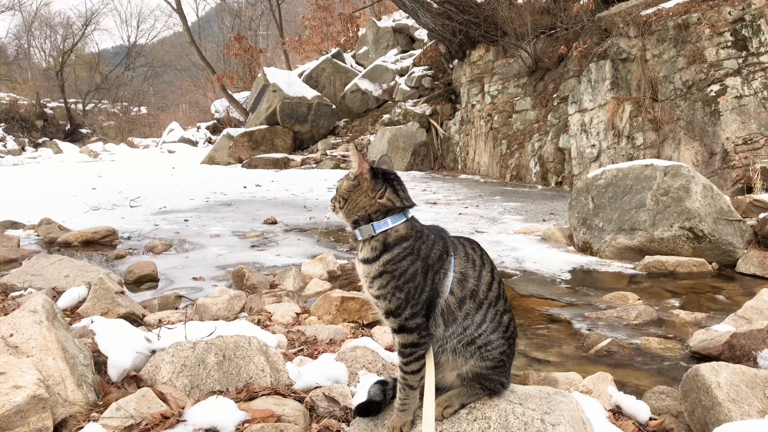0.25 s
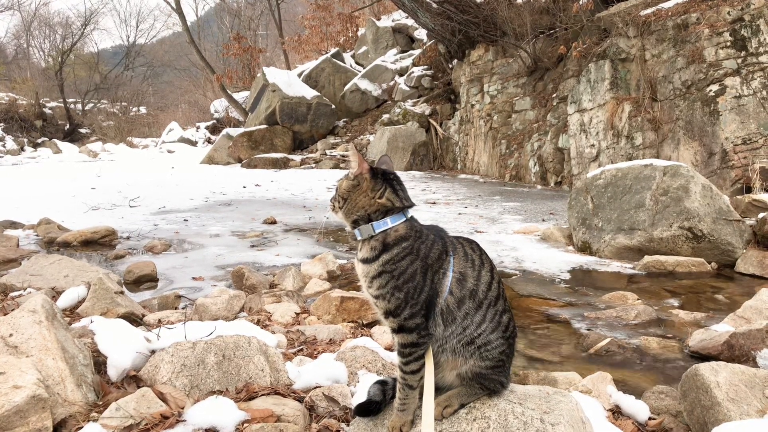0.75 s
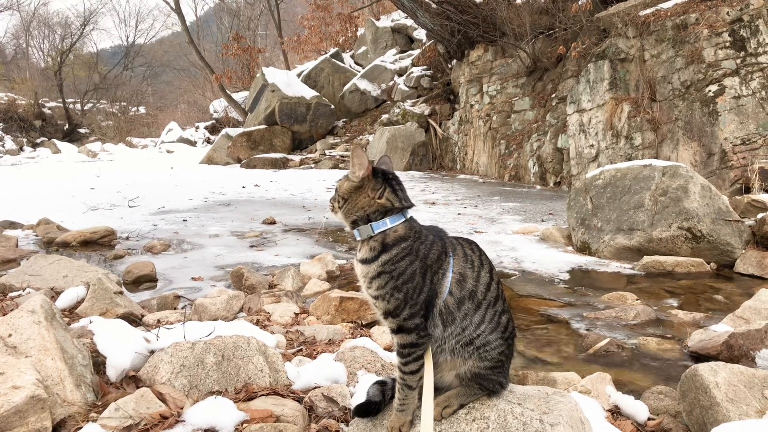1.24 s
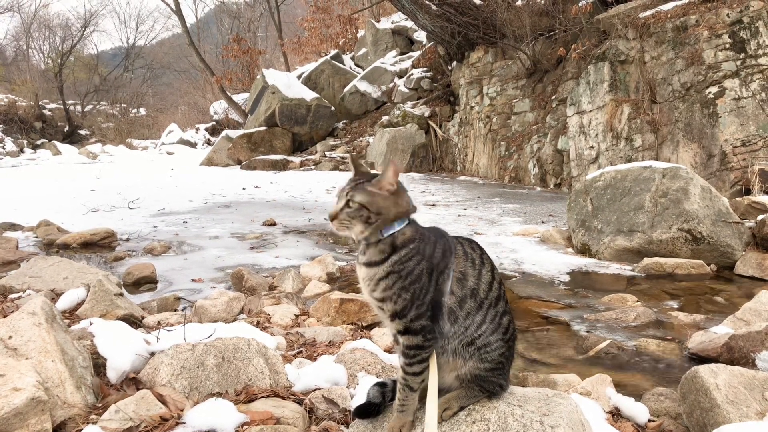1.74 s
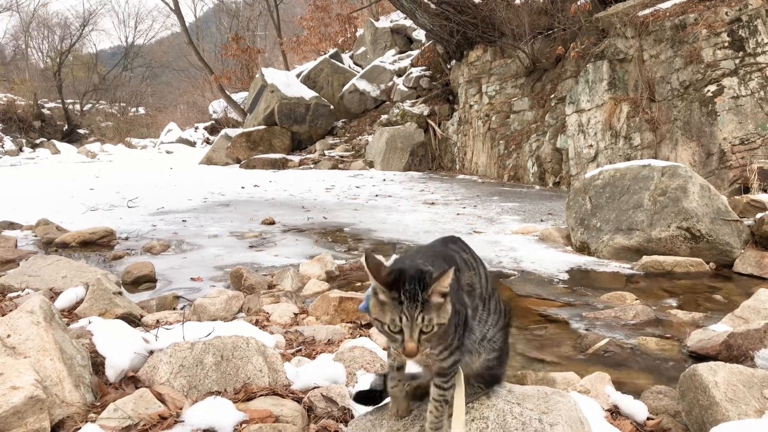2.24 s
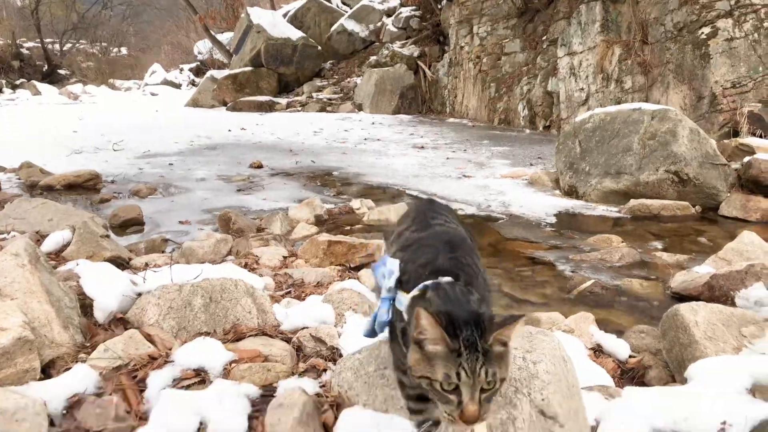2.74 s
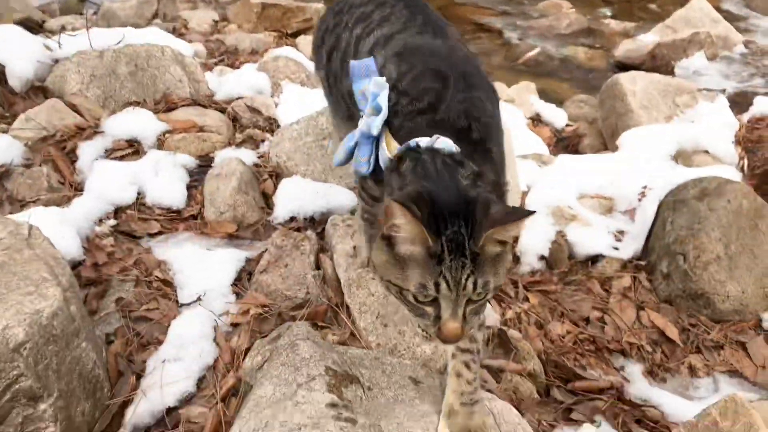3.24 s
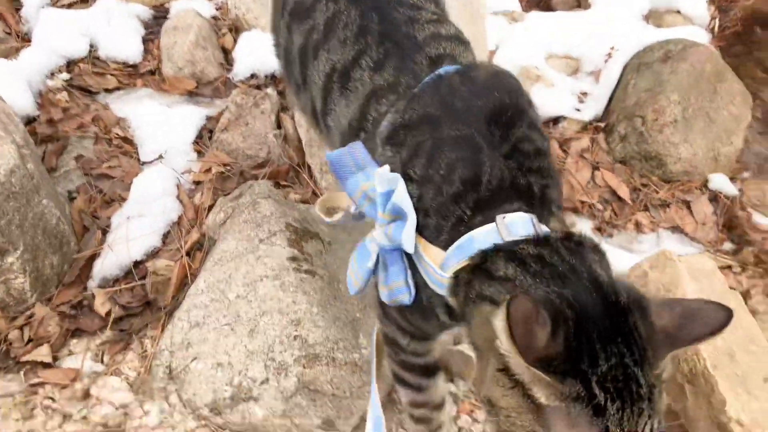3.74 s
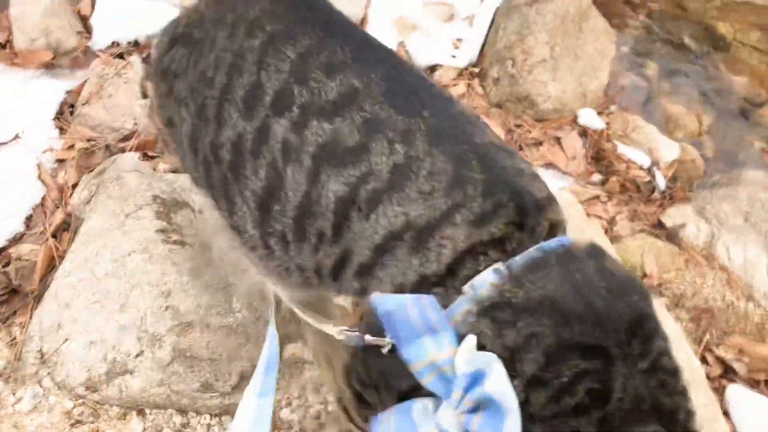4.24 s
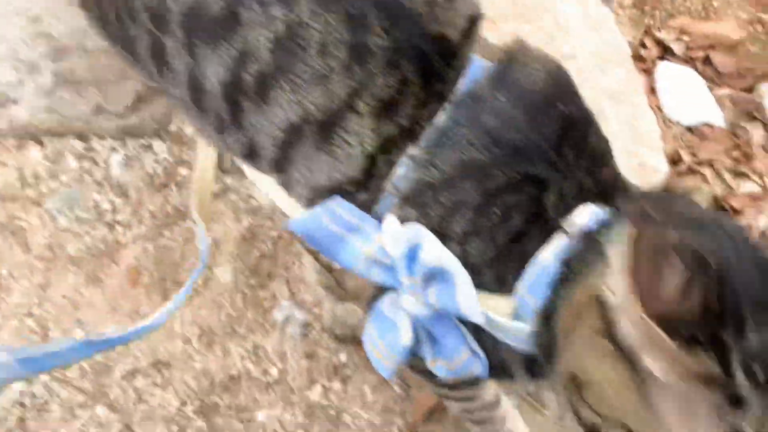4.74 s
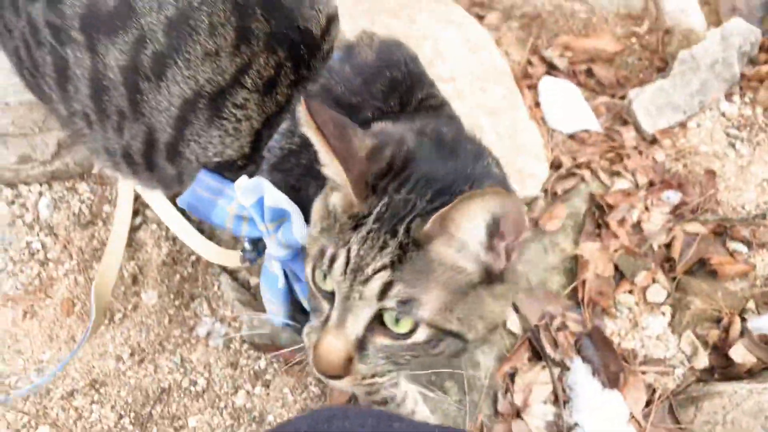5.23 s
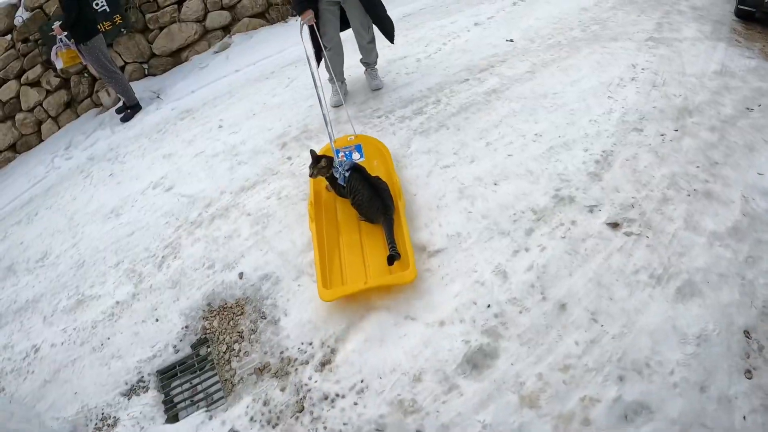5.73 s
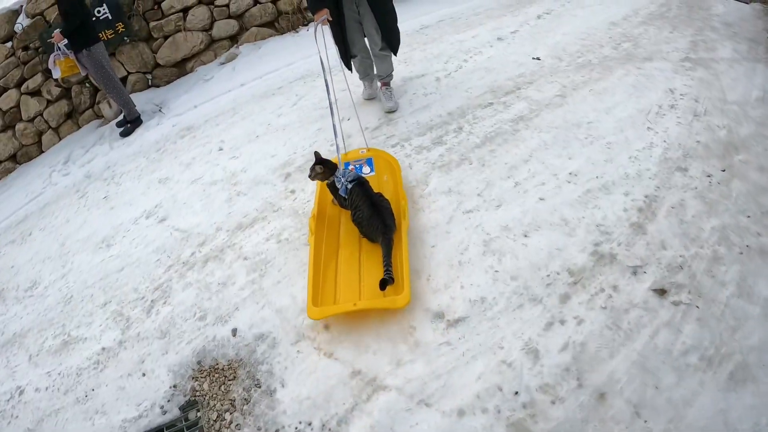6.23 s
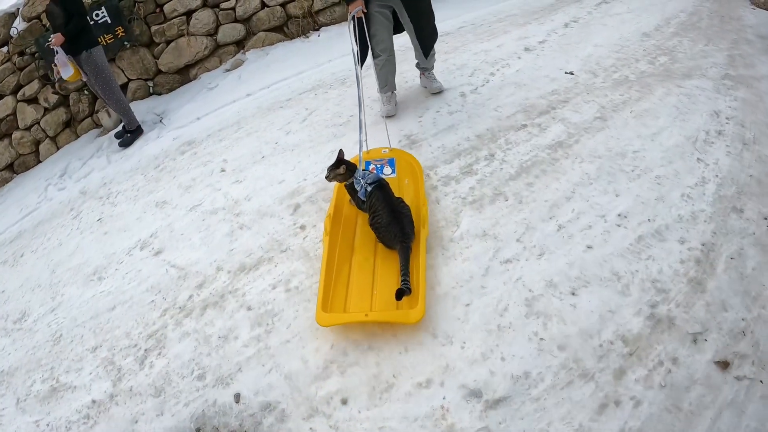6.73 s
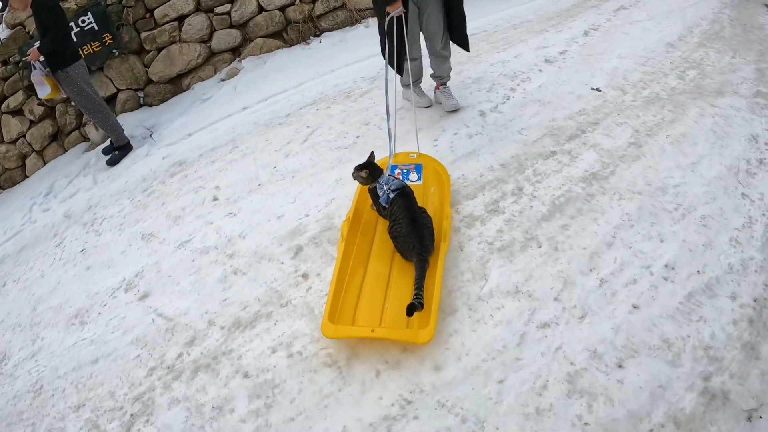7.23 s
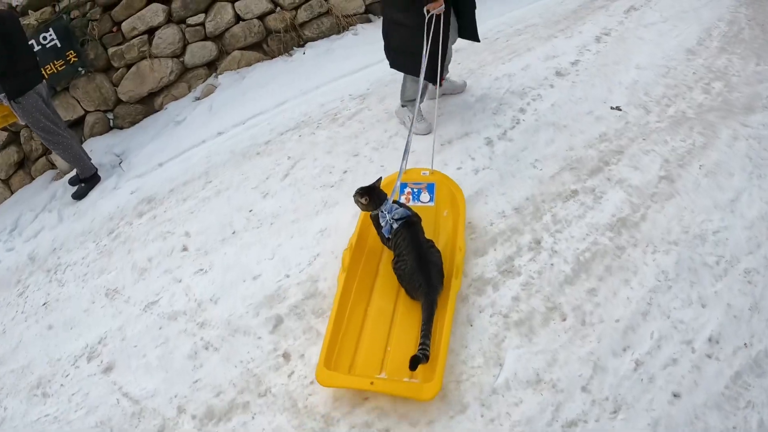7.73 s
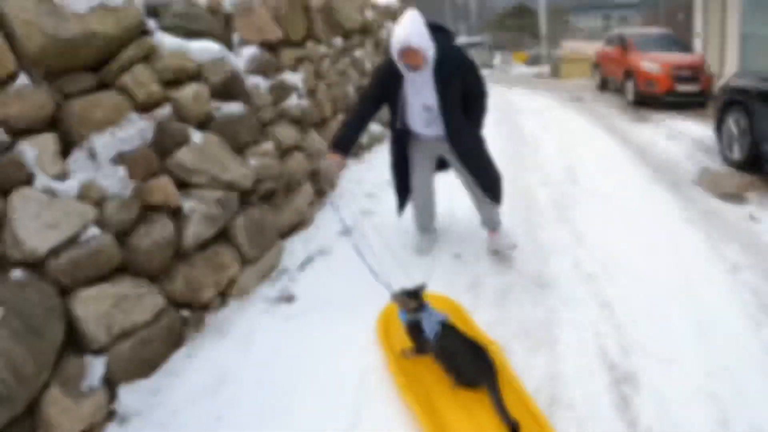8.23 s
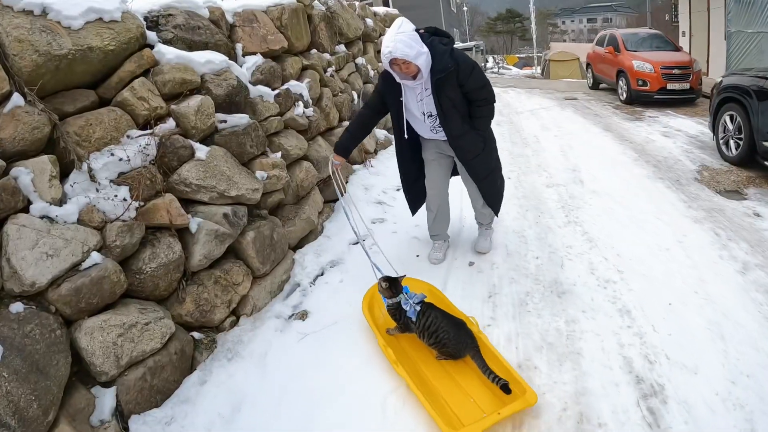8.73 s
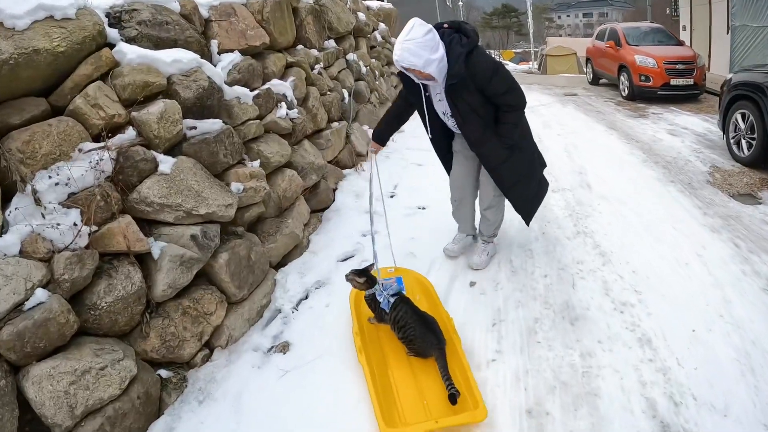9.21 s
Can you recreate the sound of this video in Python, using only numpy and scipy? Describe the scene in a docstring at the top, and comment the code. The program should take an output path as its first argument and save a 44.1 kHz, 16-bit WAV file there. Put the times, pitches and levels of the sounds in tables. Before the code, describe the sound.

Quiet running water first: a light wash, crowds of tiny bubbles, occasional rounder bloops and snapping drops, then short leaf rustles under paws. It switches suddenly to a close, coarse, loud scrape of a hollow plastic sled on icy snow, uneven and rattly, with cracks as it hits lumps. Faint low wind runs beneath, buffeting the microphone in the sled part; open air, no echo.

```python
"""A shallow stream trickles between stones and ice: coloured noise for its wash, dying tones for small and
large bubbles, short ticks and fizz for spattering drops. Paws crackle in dry leaves beside it.
The scene then cuts to a plastic sled dragged over packed snow: clicks and noise make the crunching grains,
resonances make the hollow hull drum and ring, and lumps of ice knock on it.
Low wind noise runs under both."""
import sys
import numpy as np
from scipy import signal
from scipy.io import wavfile
from scipy.ndimage import uniform_filter1d

SR = 44100
rng = np.random.default_rng(int(sys.argv[2]) if len(sys.argv) > 2 else 0)


def materialize(psi):
    """Save the field psi as 16-bit PCM at rate SR to the path in sys.argv[1].

    A 1-D psi becomes a single channel; in a 2-D psi each row is a channel.
    """
    bounded = np.clip(np.atleast_2d(psi).T, -1, 1)
    quanta = np.round(bounded * 32767).astype(np.int16)
    wavfile.write(sys.argv[1], SR, quanta)


N = 417627  # length of the sound in samples
CUT_S = 5.444  # the stream gives way to the sled here

# Tone colour of crushed snow, as the microphone housing colours it: pitch_hz, relative level_db (per Hz)
SNOW_COLOUR = [(650, -40.5), (1100, -5), (1550, -3), (2050, -0.5), (2250, 0), (4010, -5.5), (6920, -18),
               (8000, -28.5), (8850, -33.5), (10100, -25.5), (11100, -22), (12100, -35), (13100, -35.5),
               (14300, -60), (15800, -61)]
# Low resonances of the hull: pitch_hz, filter_width_hz (of one pass), relative level_db
LOW_HULL_MODES = [(165.4, 66, -15.5), (196.4, 38.4, -7), (265, 81, -4), (313.7, 45.5, 0.5),
                  (398, 120, -2.5)]


def stream():
    """All the sounds of running water, with the leaves beside it."""
    water = wash() + small_bubbles() + spatter() + large_bubbles() + snapping_drops()
    return water + leaves()


def wash():
    """Steady rush of water: coloured noise that flickers slightly in time and pitch."""
    # relative strength of the rush: pitch_hz, level_db (per Hz)
    wash_colour = [(76, -36), (130, 0.5), (342, -4), (491, -16), (589, -3), (1060, 0), (2320, -10.5),
                   (4880, -15.5), (8920, -23), (15100, -21), (16000, -27)]
    level_db = -47.5
    noise = rng.standard_normal(N) * amp(2.0 * flutter(.03))
    return amp(level_db) * patchy(colour(noise, wash_colour), patch_db=1.5, bins=30, frames=10)


def small_bubbles():
    """A crowd of small bubbles: each birth sets off a short tone at one of 44 pitches."""
    # level of the whole crowd: time_s, level_db
    flow = [(0.0, -44), (2.06, -45), (2.31, -43.5), (5.43, -45.5)]
    # relative bubble strength: pitch_hz, level_db
    strength = [(250, -16.5), (420, -8.5), (650, -0.5), (1050, 2), (1500, 0.5), (2200, -4.5), (3200, -3.5),
                (5000, -3), (8000, -19), (13000, -27)]
    pitches_hz = np.geomspace(260, 13000, num=44)
    births = clicks(1700 * amp(1.2 * flutter(.05)), spread_db=2.0)  # births per second
    pitch = rng.integers(0, 44, N)
    # each spot in the stream lets go chains of like bubbles, then rests
    busy = rng.standard_normal((44, N // 441 + 1))  # one step every 10 ms
    busy = evened(uniform_filter1d(uniform_filter1d(busy, 7, 1), 2, 0))
    births = births * amp(3.0 * busy[pitch, np.arange(N) // 441])
    crowd = np.zeros(N)
    for k, hz in enumerate(pitches_hz):
        t60 = rng.uniform(23.0, 46) / hz  # falls by 60 dB in some 23-46 cycles
        tone = bubble(hz, t60, 0.13, 1.6 / hz)
        some = births * (pitch == k)
        # small bubbles differ more in strength
        some = evened(np.sign(some) * abs(some) ** (hz / 260) ** 0.11)
        crowd += amp(read(strength, hz)) * signal.oaconvolve(some, tone)[:N]
    return amp(curves(flow)[0]) * evened(crowd)


def spatter():
    """Drops burst in clumps, each a tick with a short noisy fizz."""
    # tone colour of a bursting drop: pitch_hz, relative level_db (per Hz)
    drop_colour = [(1200, -20), (3000, 2), (6000, 10.5), (10000, 4.5), (16000, 2.5)]
    # level of the spatter: time_s, level_db
    spray = [(0, -59.5), (2.5, -56), (3.3, -57.5), (3.7, -54), (4.5, -57), (5.43, -56)]
    bursts = abs(clicks(500 * amp(4.4 * flutter(.015)), spread_db=2.0))
    fade = amp(-60 / SR / 0.0058)  # per sample: 60 dB in 5.8 ms
    fizz = signal.lfilter([1], [1, -fade], bursts) * rng.standard_normal(N)
    return amp(curves(spray)[0]) * patchy(colour(fizz, drop_colour), patch_db=7.0, bins=22, frames=3)


def large_bubbles():
    """Single large bubbles that stand out, each a dying tone of slightly rising pitch."""
    # start_s, level_db, pitch_hz, time to fall by 60 dB: t60_s
    bubble_list = [(0.287, -36, 586, 0.11), (0.366, -36, 535, 0.087), (0.643, -34, 560, 0.17),
                   (0.789, -37, 710, 0.05), (0.9, -34, 1320, 0.04), (0.919, -38, 563, 0.055),
                   (1.265, -31, 544, 0.045), (1.344, -35, 382, 0.064), (1.522, -37.5, 1850, 0.05),
                   (1.566, -36, 550, 0.08), (1.779, -36, 593, 0.065), (2.299, -33, 684, 0.14),
                   (2.337, -41, 734, 0.045), (2.362, -30.5, 735, 0.05), (2.384, -34, 665, 0.05),
                   (2.493, -32.5, 680, 0.11), (2.668, -38, 587, 0.05), (2.72, -36, 1330, 0.058),
                   (2.984, -35, 1160, 0.05), (3.039, -35, 567, 0.054), (3.077, -33, 1090, 0.034),
                   (3.111, -25.5, 670, 0.058), (3.173, -31.5, 1080, 0.05), (3.189, -30, 1060, 0.04),
                   (3.337, -31, 745, 0.037), (3.359, -34, 490, 0.055), (3.438, -30.5, 710, 0.024),
                   (3.989, -32.5, 670, 0.057), (4.213, -35, 1090, 0.054), (4.328, -36, 1280, 0.073),
                   (4.609, -39, 1080, 0.05), (4.647, -36, 670, 0.08), (4.66, -29, 668, 0.19),
                   (4.699, -32, 650, 0.099), (4.836, -34.5, 287, 0.1), (5.106, -33.5, 620, 0.11),
                   (5.401, -31, 1250, 0.038)]
    out = np.zeros(N)
    for s, db, hz, t60 in bubble_list:
        add(out, s, amp(db) * bubble(hz, t60, 0.037, 0.00083))
    return out


def snapping_drops():
    """Single drops that snap: a very short bubble tone with a softer tick of noise."""
    # start_s, relative level_db, pitch_hz
    drop_list = [(0.2876, -32, 2990), (0.844, -35, 4840), (0.8609, -35, 9250), (0.909, -32, 3550),
                 (1.3467, -32, 3690), (1.5703, -28, 5270), (2.3371, -33, 3140), (2.5232, -35, 7670),
                 (2.557, -32, 3560), (3.176, -34, 3190), (3.6, -31, 5140), (3.7564, -32, 4740),
                 (3.918, -32, 7680), (4.4343, -33, 6820), (4.58, -33.5, 3850), (5.2164, -34, 3220)]
    out = np.zeros(N)
    for s, db, hz in drop_list:
        tick = rng.standard_normal(60) * amp(-60 * np.arange(60) / SR / 0.0034)
        add(out, s, amp(db - 4.0) * bubble(hz, 0.011, 0.1, 0.00013))
        add(out, s, amp(db - 13.0) * tick)
    return out


def leaves():
    """Dry leaves crackle as paws press on them: clicks and noise, let through in short spans."""
    # paws press into the leaves: start_s, length_s, level_db at the start
    rustles = [(2.77, 0.056, -46), (2.84, .04, -54), (2.928, .03, -50), (3.966, .015, -35),
               (3.982, 0.048, -40), (4.032, 0.18, -47), (4.224, .045, -50), (4.268, .006, -40),
               (4.294, 0.053, -47)]
    # tone colour of the rustle: pitch_hz, relative level_db (per Hz)
    leaf_colour = [(1500, -20), (3500, 0), (9000, -4.5), (16000, -7.5)]
    fade_db, edge_s = -7, .003  # a rustle sets in at once, sinks by this much, and stops
    grains = evened(clicks(2800.0, spread_db=5.5)) + rng.standard_normal(N)
    crackle = evened(colour(grains, leaf_colour))
    t = np.arange(N) / SR
    loudness = np.zeros(N)
    for s, length, db in rustles:
        progress = np.clip((t - s) / length, 0, 1)
        loudness += span(s, length, edge_s) * amp(db + fade_db * progress)
    return crackle * loudness


def sled():
    """The dragged sled with its knocks, less the narrow band that the microphone housing cancels."""
    # centre_hz, width_hz
    housing_notch = (8930, 940)
    hz, width = housing_notch
    return signal.lfilter(*signal.iirnotch(hz, hz / width, SR), drag() + ice_knocks())


def drag():
    """Thousands of snow grains a second break under the runners and shake the hull's resonances."""
    # levels before the rough patches: time_s, crunch_db, hull_ring_db, hull_drum_db
    drag_levels = [(5.46, -12, -17.5, -22.5), (5.54, -18, -21, -24.5), (5.59, -21, -27.5, -29.5),
                   (5.8, -21, -21.5, -27.5), (5.97, -21.5, -23.5, -26.5), (6.1, -22, -21, -25),
                   (6.2, -19.5, -21, -25.5), (6.62, -17.5, -17, -24), (6.78, -18.5, -20, -25),
                   (6.96, -17.5, -17.5, -18), (7.06, -22, -23, -25), (7.33, -23, -24, -28),
                   (7.58, -20.5, -21.5, -27.5), (7.95, -20, -22, -22.5), (8.22, -19, -19.5, -23),
                   (8.45, -18, -19, -25.5), (8.72, -20.5, -21.5, -22.5), (8.85, -16.5, -17, -17.5),
                   (9.0, -15.5, -20, -18), (9.16, -14.5, -17, -13), (9.35, -16, -20, -17),
                   (9.46, -15, -21, -17)]
    # rough patches of ice under the runners: start_s, length_s, extra_db
    patches = [(5.725, 0.027, 2), (5.907, 0.056, 2), (6.002, 0.053, 2.5), (6.152, .07, 2),
               (6.272, 0.038, 2), (6.333, .03, 3.5), (6.39, 0.023, 2.5), (6.44, 0.042, 2.5),
               (6.547, 0.07, 0.5), (6.833, 0.079, 1.5), (7.147, 0.064, 5), (7.224, 0.061, 4),
               (7.366, 0.07, 4), (7.452, 0.067, 2.5), (7.74, 0.047, 1.5), (8.3, 0.095, 2.5),
               (8.484, 0.075, 3), (8.606, 0.043, 2.5), (8.901, 0.047, 1), (9.12, 0.038, 1),
               (9.25, 0.016, 0.5)]
    # upper resonances of the hull: pitch_hz, filter_width_hz (of one pass), relative level_db
    upper_modes = [(612, 190, 1.5), (800.4, 106, 2), (956, 200, 0), (1180, 520, -15.5), (2052, 154, -11)]
    ring_share, drum_share = 1.06, 0.99  # how much of a patch's extra dB reaches ring and drum
    crunch_db, ring_db, drum_db = curves(drag_levels)
    rough_db = sum(db * span(s, length, 0.005) for s, length, db in patches)
    grip_db = 0.22 * flutter(.012) + 0.6 * flutter(.03)  # the runners catch and slip
    grains = evened(clicks(5000., spread_db=2.0)) + 1.02 * rng.standard_normal(N)
    crunch = patchy(colour(grains * amp(grip_db), SNOW_COLOUR), patch_db=1.5, bins=3, frames=12)
    upper = evened(ring(grains * amp(grip_db + 1.04 * flutter(.02)), upper_modes))
    rumble = rng.standard_normal(N) * amp(grip_db + 1.03 * flutter(.025))
    drum = evened(ring(rumble, LOW_HULL_MODES))
    out = amp(crunch_db + rough_db) * crunch
    out += amp(ring_db + ring_share * rough_db) * upper
    out += amp(drum_db + drum_share * rough_db) * drum
    return out


def ice_knocks():
    """Runners strike lumps of ice: a noisy crack, then a thud as the hull slaps down."""
    # start_s, relative level_db, thud_db against the crack, size of the first snap against the burst (ratio)
    knock_list = [(5.465, 3, -12, 0), (5.6353, 5, -5.5, 2), (5.664, -4.5, -1.5, 0), (6.2926, 1.5, -23, 2),
                  (6.347, 5, -22, 0), (6.4444, 1, -13, 0), (6.8417, 9, -20, 9), (7.1548, 1, -22, 2),
                  (7.173, -4, -1.5, 1), (7.4525, -0.5, -20, 0), (8.0538, 1.5, -19, 0)]
    lag_s, slap_s = 0.0096, 0.0057  # delay of the slap; length of its push and rebound
    t = np.arange(3000) / SR
    slap = np.sin(2 * np.pi * np.clip((t - lag_s) / slap_s, 0, 1))
    thud = ring(slap, LOW_HULL_MODES)
    out = np.zeros(N)
    for s, db, thud_db, snap in knock_list:
        burst = rng.standard_normal(len(t)) * amp(-60 * t / 0.07) * (1 - np.exp(-t / 0.0019))
        burst += snap * signal.unit_impulse(len(t))
        crack = colour(burst, SNOW_COLOUR)
        knock = crack / abs(crack).max() + amp(thud_db) * thud / abs(thud).max()
        add(out, s, amp(db - 8.5) * knock)
    return out


def wind():
    """Wind at the microphone: a lumpy low rumble with a lull and some swells in level."""
    # tone colour of the wind: pitch_hz, relative level_db (per Hz)
    wind_colour = [(20, -34), (45, -8.5), (60, -2), (100, -1), (150, -15.5), (300, -67)]
    # gusts: peak_s, change_db from the steady wind
    gusts = [(1.9, 4), (5.43, 7.5), (5.72, 9), (6.2, 9.5), (7.18, 10.5), (7.7, 7), (8.1, 24.5), (9.15, -1)]
    # the wind eases in this span: start_s, end_s
    lull = (3.7, 5.1)
    stream_db, sled_db, eases_db = -55, -58, -3.5
    rise_s, fall_s = 0.065, .12  # bell-curve widths of a gust before and after its peak
    t = np.arange(N) / SR
    level_db = np.where(t < CUT_S, stream_db, sled_db) + eases_db * span(lull[0], lull[1] - lull[0], .4)
    for s, db in gusts:
        width_s = np.where(t < s, rise_s, fall_s)
        level_db = level_db + db * np.exp(-.5 * ((t - s) / width_s) ** 2)
    lumps = rng.standard_normal(N) * amp(3.7 * flutter(.06))
    return amp(level_db) * evened(colour(lumps, wind_colour, size=8192))


def bubble(hz, t60, rise, start_s):
    """A dying tone whose pitch climbs as the bubble nears the surface."""
    t = np.arange(round(t60 * SR) + 8) / SR
    shape = (1 - np.exp(-t / start_s)) * amp(-60 * t / t60)
    cycles = hz * (t + rise * t ** 2 / t60)
    return shape / shape.max() * np.sin(2 * np.pi * cycles)


def ring(x, modes):
    """Sum of resonances of alternating sign, each applied twice for steep skirts."""
    out = np.zeros(len(x))
    for k, (hz, width, db) in enumerate(modes):
        b, a = signal.iirpeak(hz, hz / width, SR)
        twice = signal.lfilter(b, a, signal.lfilter(b, a, x))
        out += (-1) ** k * amp(db) * twice
    return out


def clicks(per_s, spread_db):
    """Random impulses of either sign; a few are large."""
    hit = rng.random(N) < per_s / SR
    size = np.minimum(rng.exponential(1, N), 4.5)
    sign = rng.choice([-1., 1.], N)
    return sign * amp(spread_db * size) * hit


def flutter(span_s):
    """Slow random drift of average size (rms) about 1 that changes over about span_s."""
    steps = np.arange(0, N / SR + 1, 1 / 200)
    drift = uniform_filter1d(rng.standard_normal(len(steps)), max(round(span_s * 200), 1))
    return np.interp(np.arange(N) / SR, steps, evened(drift))


def patchy(x, patch_db, bins, frames):
    """Random patches of time and frequency come out louder or softer."""
    z = signal.stft(x, nperseg=256, noverlap=192)[2]
    field = rng.standard_normal(z.shape)
    field = evened(uniform_filter1d(uniform_filter1d(field, bins, 0), frames, 1))
    return evened(signal.istft(z * amp(patch_db * field), nperseg=256, noverlap=192)[1][:N])


def colour(x, points, size=4096):
    """Filter that never sounds ahead of its input: its phase is the Hilbert transform of the log gain."""
    hz = abs(np.fft.fftfreq(size, 1 / SR))
    log_gain = np.log(amp(np.maximum(read(points, hz), -90)))
    taps = np.fft.ifft(np.exp(np.conj(signal.hilbert(log_gain)))).real
    return signal.oaconvolve(x, taps)[:len(x)]


def read(points, hz):
    """A spectrum joined by straight lines on a log-frequency axis."""
    f, db = np.transpose(points)
    return np.interp(np.log(hz + 1), np.log(f + 1), db)


def curves(rows):
    """Columns of a table after the time column, one value for each sample."""
    s, *columns = np.transpose(rows)
    return [np.interp(np.arange(N) / SR, s, c) for c in columns]


def span(start, length, edge_s):
    """1 within the span, 0 outside, with straight edges."""
    t = np.arange(N) / SR - start
    return np.clip(np.minimum(t, length - t) / edge_s + .5, 0, 1)


def add(mix, s, sound):
    """Mix a sound in at s seconds, cut off at the end of the mix."""
    part = mix[round(s * SR):][:len(sound)]
    part += sound[:len(part)]


def amp(db):
    """Decibels to a multiplying factor."""
    return 10 ** (np.asarray(db) / 20)


def evened(x):
    """Scale to an average size (rms) of 1."""
    return x / np.sqrt(np.mean(x ** 2) + 1e-20)


def scene():
    """The stream, then a 12 ms cross-fade to the sled, with wind throughout."""
    later = np.clip((np.arange(N) / SR - CUT_S) / .012, 0, 1) ** 2
    return ((1 - later) * stream() + later * sled() + wind())[None]


def record(dry):
    """Peaks above 0.8 bend softly towards full scale; then the highest treble is cut."""
    edge_hz = 15800
    over = np.maximum(abs(dry) - .8, 0)
    soft = dry - np.sign(dry) * (over - .2 * np.tanh(over / .2))
    low_pass = signal.firwin(511, edge_hz, window=("kaiser", 9), fs=SR)
    return signal.oaconvolve(soft, low_pass[None], "same")


dry = scene()
out = record(dry)
materialize(out)
```